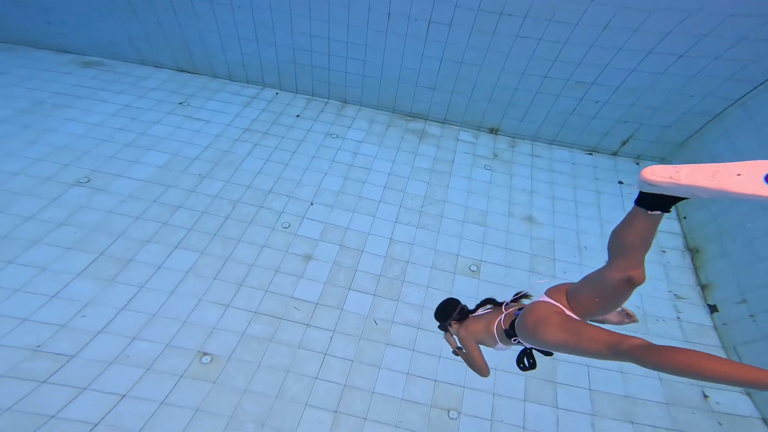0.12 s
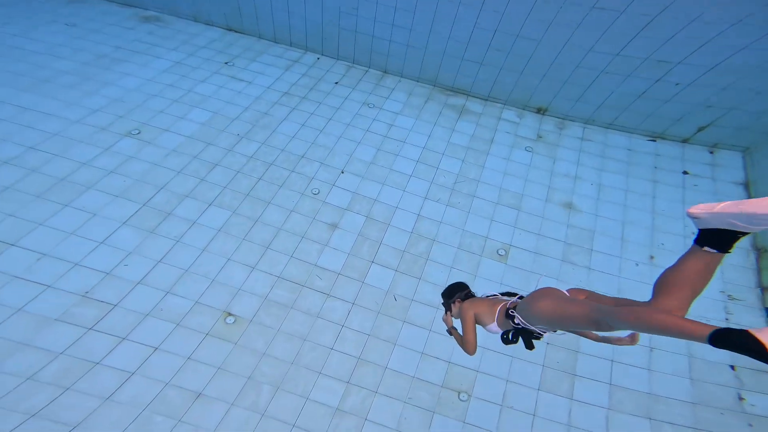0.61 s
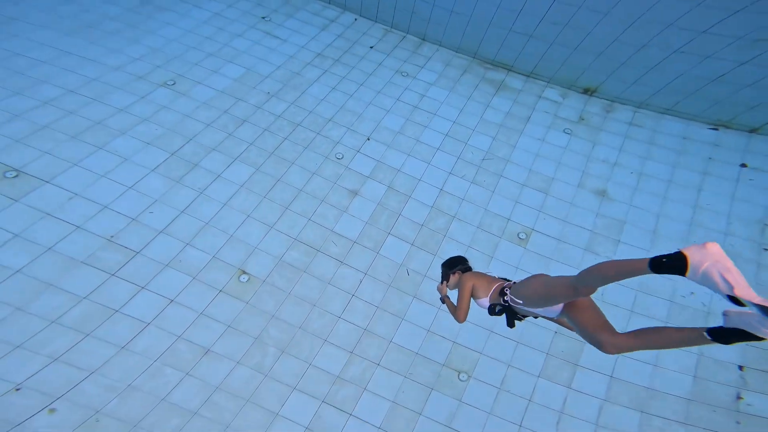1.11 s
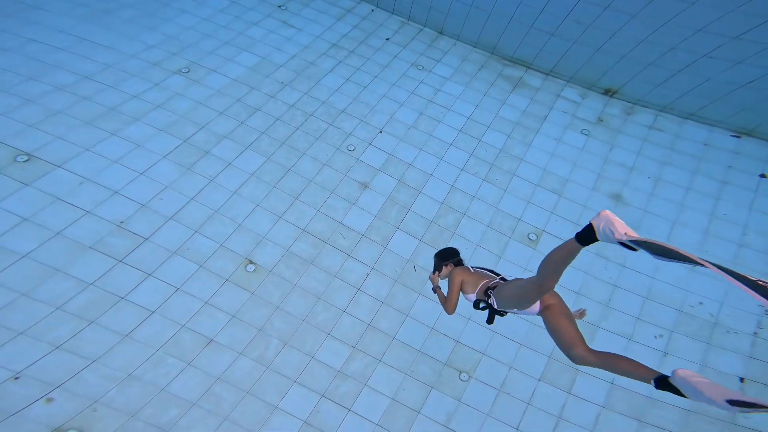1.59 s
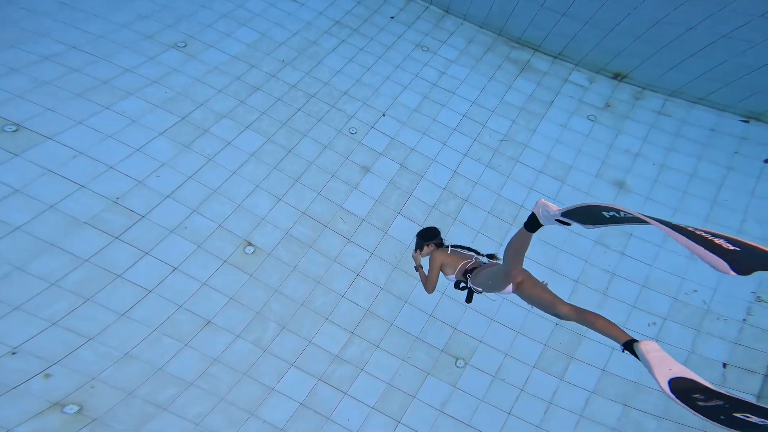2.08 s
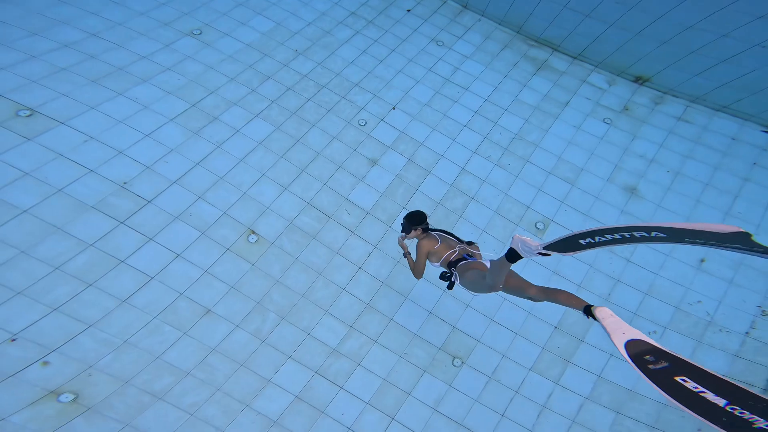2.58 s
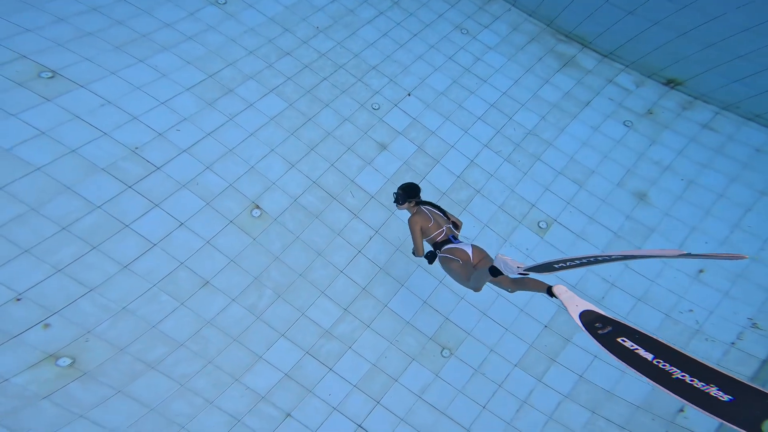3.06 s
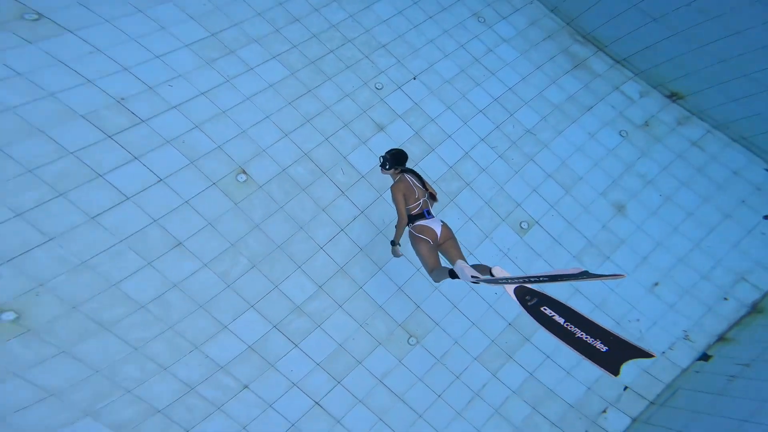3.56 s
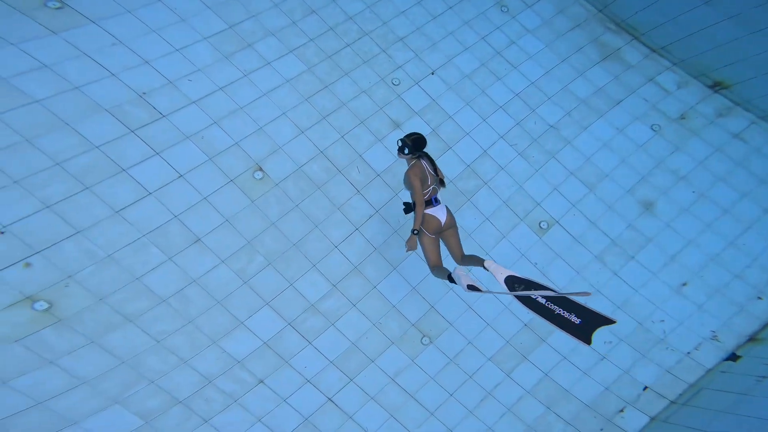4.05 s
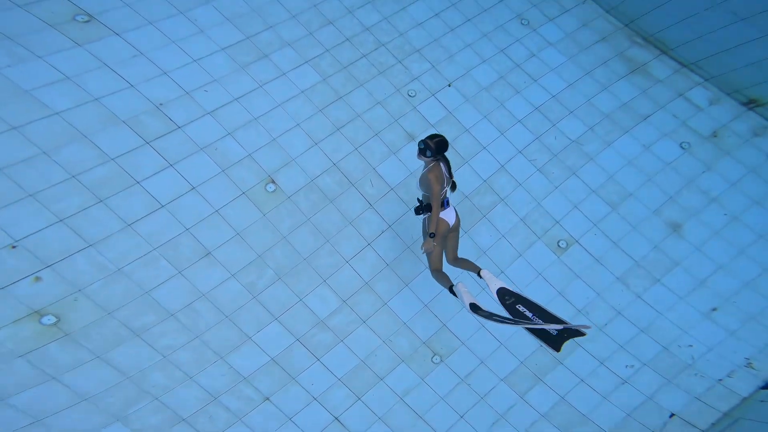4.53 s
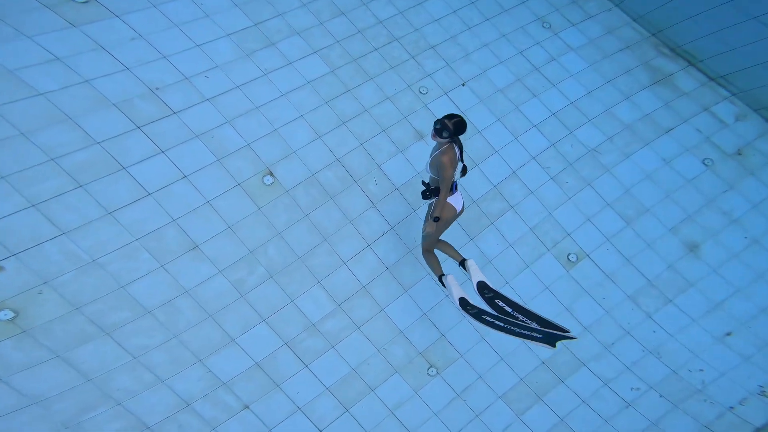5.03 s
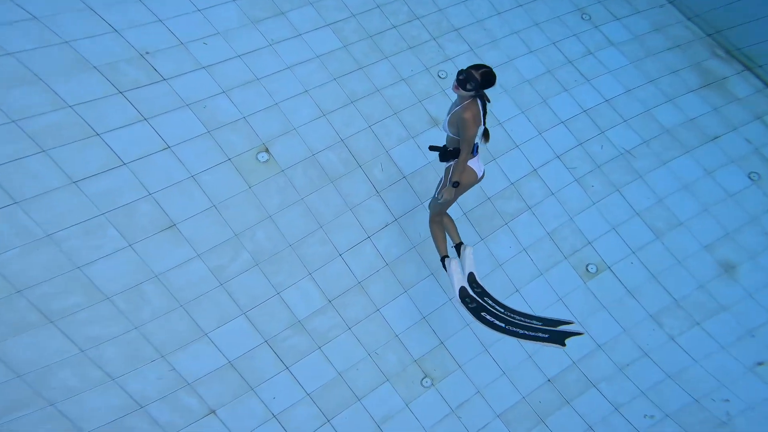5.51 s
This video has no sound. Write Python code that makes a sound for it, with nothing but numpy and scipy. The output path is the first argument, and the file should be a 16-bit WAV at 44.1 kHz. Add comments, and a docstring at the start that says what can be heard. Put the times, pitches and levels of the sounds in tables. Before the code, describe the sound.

Muffled underwater pool hum with a wavering drone, then hand rubs, hollow gulps, dull knocks and bubbling fizz on a camera housing.

```python
"""A tiled swimming pool, under water, heard through the sealed housing of a hand-held camera. Water pushing
past is low shaped noise; the pool hums as noise through resonances, with a wavering drone at first. A hand rubs
in grainy noise strokes, trapped air gulps and the catching hand jerks as damped gliding tones, and the grip
swings low. Knocks and ticks are short rough pushes that ring the housing; bubbles are small damped tones over
fizz and spray. The stereo image starts narrow and opens."""
import sys
import numpy as np
from scipy import signal
from scipy.fft import rfft, irfft, next_fast_len
from scipy.io import wavfile
from scipy.ndimage import uniform_filter1d

SR = 44100
rng = np.random.default_rng(int(sys.argv[2]) if len(sys.argv) > 2 else 0)


def field_ratio(decibels):
    """Amplitude ratio for a level in dB (20 dB per decade); scalars and array-likes work."""
    return 10 ** (np.asarray(decibels, dtype=float) / 20)


def pcm_store(signal):
    """Save signal as 16-bit PCM."""
    levels = np.round(np.clip(np.atleast_2d(signal), -1, 1) * 32767)
    wavfile.write(sys.argv[1], SR, levels.astype(np.int16).T)


N = 248724  # length in samples
SIZE = next_fast_len(N + SR)  # filter length, with a second of room for tails
HZ = np.arange(SIZE // 2 + 1) * SR / SIZE + 1e-3  # kept above zero for the logarithms
TIME = np.arange(N) / SR

# colour of the pool hum, and of the knocks, under the resonances: (f/Hz, relative level/dB)
HUM_COLOUR = [(70, -16.5), (110, -0.5), (170, -1.5), (260, -4), (420, -5), (520, -7), (650, -17.5),
              (800, -46), (1200, -55.5)]
# control levels at which the layers that follow them have their own stated level
REST_SURGE_DB, REST_FIZZ_DB = -38, -66
# exponents bending the pressure curve of a stroke; treble layers follow it more steeply
PRESS_POWER, TREBLE_POWER = 0.86, 2.7


def on_hz(table):
    """Read a (f/Hz, value) table on a log-frequency axis."""
    hz, value = np.transpose(table)
    return np.interp(np.log(HZ), np.log(np.maximum(hz, 1)), value)


def colour(table):
    """Minimum-phase response of a (f/Hz, level/dB) table, falling steeply past its last point."""
    db = on_hz(table) - 24 * np.log2(np.maximum(HZ / table[-1][0], 1))
    # folding the cepstrum forward in time gives the minimum phase
    cepstrum = irfft(db * np.log(10) / 20, SIZE)
    cepstrum[1:SIZE // 2] *= 2
    cepstrum[SIZE // 2 + 1:] = 0
    return np.exp(rfft(cepstrum))


def unit(response):
    """Scale a response so that white noise of rms 1 leaves with rms 1."""
    return response / np.sqrt(np.mean(np.abs(response) ** 2))


def through(x, response):
    """Filter by a complex response."""
    return irfft(rfft(x, SIZE) * response, SIZE)[..., :N]


def walk(rate):
    """Random levels held 1 / rate seconds and slewed twice."""
    hold = int(SR / rate)
    steps = np.repeat(rng.standard_normal(N // hold + 1), hold)
    return uniform_filter1d(uniform_filter1d(steps, hold), hold)[:N]


def turbulence(db, flicker_db=0., rate=12., grains=0., spread_db=5.):
    """Shared and unshared noise on a flickering level curve, with scattered grains (per second) on top."""
    hits = rng.random(N) < grains / SR
    sizes = hits * field_ratio(spread_db * np.minimum(rng.exponential(size=N), 5))
    grain_lift = uniform_filter1d(sizes, 60) * 60  # each grain lasts 60 samples
    rough = rng.standard_normal((2, N)) * (1 + grain_lift)
    return rough * field_ratio(db + flicker_db * walk(rate))


def patchy(x, patchy_db, rate):
    """Each third of an octave swells and fades on its own, as clouds of bubbles come and go."""
    spectrum, out = rfft(x, SIZE), 0
    place = np.clip(3 * np.log2(HZ / 700), 0, 12)
    for band in range(13):
        share = np.clip(1 - np.abs(place - band), 0, 1)
        out = out + irfft(spectrum * share, SIZE)[:, :N] * field_ratio(patchy_db * walk(rate))
    return out


def rings(table, glide, rise_s, rough=0.):
    """Damped swings rising in pitch by the share glide per t60; rough makes the pitch wobble."""
    # table: (t/s, level/dB, starting f/Hz, t60/s)
    out, t = np.zeros(N + SR), np.arange(SR // 4) / SR
    for s, db, hz, t60 in table:
        fade = np.exp(-np.log(1000) * t / t60) * (1 - np.exp(-t / rise_s))
        steps = np.repeat(rng.standard_normal(len(t) // 128 + 1), 128)[:len(t)]
        wobble = 1 + rough * steps
        phase = 2 * np.pi * np.cumsum(hz * (1 + glide * t / t60) * wobble) / SR
        i = int(s * SR)
        out[i:i + len(t)] += field_ratio(db) * fade / fade.max() * np.sin(phase)
    return out[:N]


def blows(table, response, pivot_hz, strike):
    """Rough decaying pushes ring a response; a brightness in dB an octave tilts each one about the pivot."""
    # table: (t/s, peak level/dB, brightness/dB an octave, decay of the contact/s)
    out, t = np.zeros((2, N + SR)), np.arange(8192) / SR
    lead = 200  # samples of room ahead of the touch
    ring = rfft(irfft(response, SIZE)[:len(t)])
    octaves = np.log2(np.clip(np.arange(len(ring)) * SR / len(t), 200, 5200) / pivot_hz)
    for s, db, tilt_db, contact_s in table:
        push = rng.standard_normal((2, len(t))) * np.exp(-t / max(contact_s, 2e-4))
        push[0, 0] = strike * np.sqrt(contact_s * SR)  # the first touch is a clean hit, the rest drags
        sound = irfft(rfft(np.roll(push, lead, axis=1)) * ring * field_ratio(tilt_db * octaves))
        i = int(s * SR) - lead
        out[:, i:i + len(t)] += field_ratio(db) * sound / np.abs(sound[0]).max()
    return out[:, :N]


def housing():
    """Response of the shell: each resonance lifts or dips its own band, and narrow ones ring on."""
    # housing resonances: (f/Hz, width/Hz, lift/dB)
    resonances = [(282.4, 33, 11.5), (359.4, 26, 6), (445.9, 20.7, 20), (490, 520, -1), (578.6, 22, 8),
                  (797, 53, 12), (1040, 5.5, 8.5), (1216, 180, 7), (1590, 80, 9.5), (2004, 140, 4.5),
                  (2749, 81, 5.5), (4020, 100, -4.5), (4806, 290, 6), (5520, 150, 4.5), (6980, 200, 3),
                  (7730, 200, 4.5)]
    response = 1
    for hz, width, db in resonances:
        detuning = (HZ / hz - hz / HZ) * hz / max(width, 4)
        response = response * (1 + (field_ratio(db) - 1) / (1 + 1j * detuning))
    return response


def motion_db():
    """Surge level in dB as the camera is pushed through the water."""
    # camera pushed through the water: (t/s, surge level/dB)
    motion = [(0.0, -44.5), (1.36, -34), (1.79, -36.5), (2.04, -14.5), (2.18, -36.5), (2.4, -29.5),
              (2.5, -38.5), (3.12, -31.5), (3.16, -18.5), (3.27, -24.5), (3.35, -42), (3.42, -17),
              (3.6, -23.5), (3.93, -34.5), (4.27, -26), (4.34, -22.5), (4.46, -30), (4.82, -17.5),
              (5.59, -25.5), (5.64, -21.5)]
    return np.interp(TIME, *np.transpose(motion))


def stir_db(t):
    """Fizz level in dB at the times t as water is stirred around the housing."""
    # water stirred around the housing: (t/s, fizz level/dB)
    stir = [(0.0, -69.5), (0.27, -69.5), (0.92, -65.5), (2.17, -63.5), (2.43, -64.5), (3.119, -62),
            (3.3, -56.5), (3.38, -61), (3.531, -63), (3.751, -65), (4.75, -58.5), (5.35, -56.5),
            (5.51, -52), (5.64, -56.5)]
    return np.interp(t, *np.transpose(stir))


def strokes(power, wet, firm=0.95):
    """Level in dB of all hand strokes: pressure rounds up to the firmest moment, then down."""
    # hand sliding on the housing: (start t/s, firmest t/s, end t/s, scrape level/dB before firm scales it,
    # wetness/dB of the treble against the scrape)
    rubs = [(1.184, 1.261, 1.326, -38, -17.5), (1.267, 1.331, 1.31, -45.5, -7.5),
            (1.923, 1.943, 1.964, -33, -14.5), (1.941, 1.974, 2.02, -34.5, -14),
            (1.954, 2.043, 2.095, -29.5, -21), (3.083, 3.115, 3.214, -35.5, -12.5),
            (3.16, 3.269, 3.643, -41, -31.5), (3.359, 3.46, 3.546, -27.5, -14.5),
            (3.572, 3.601, 3.6, -45.5, -15), (5.331, 5.497, 5.52, -36, -20.5)]
    grip = np.array([np.interp(TIME, row[:3], (0, 1, 0)) for row in rubs])
    pressure = np.sin(np.pi / 2 * grip)
    # firm: dB of level per dB of scrape above -30 dB
    peak = field_ratio([firm * (row[3] + 30) - 30 + wet * row[4] for row in rubs])[:, None]
    return 10 * np.log10(np.sum((peak * pressure ** power) ** 2, axis=0) + 1e-20)


def surge():
    """Water pushing past shakes the whole camera: low rumbling noise that follows the motion."""
    # colour of the surge: (f/Hz, relative level/dB)
    surge_colour = [(8, -23), (18, 1.5), (30, -8), (42, -7), (60, -25.5), (100, -35), (300, -63)]
    return through(turbulence(motion_db()), unit(colour(surge_colour)))


def sway():
    """The grip sways in low noise, in step with the surge and with the strokes of the hand."""
    # colour of the sway: (f/Hz, relative level/dB)
    sway_colour = [(30, -23), (45, -3.5), (60, -5), (72, -4), (90, -20), (150, -35), (300, -57)]
    drift = field_ratio(-45.5 + 0.71 * (motion_db() - REST_SURGE_DB))
    shake = field_ratio(strokes(PRESS_POWER, wet=False) + 5)
    level_db = 20 * np.log10(np.hypot(drift, shake))
    return through(turbulence(level_db, flicker_db=1.0, rate=11.0), unit(colour(sway_colour)))


def jolts():
    """Jolts set the grip swinging: low damped tones that glide up."""
    # jolts: (t/s, level/dB, starting swing f/Hz, t60/s)
    swings = [(1.19, -21.5, 44.7, 0.07), (1.315, -22, 30.9, 0.14), (1.235, -22.5, 72.7, 0.3),
              (1.94, -15, 48, 0.2), (1.985, -17.5, 65.5, 0.23), (2.099, -14.5, 64.3, 0.2),
              (3.15, -15.5, 54, 0.15), (3.41, -10, 40.2, 0.058), (3.525, -11.5, 48.5, 0.049),
              (4.76, -19, 40.8, 0.091)]
    return rings(swings, glide=0.23, rise_s=0.029)


def pool_hum(body):
    """The pool hums in step with the stirring: flickering noise in the resonances."""
    level_db = -45 + 0.69 * (stir_db(TIME) - REST_FIZZ_DB)
    return through(turbulence(level_db, flicker_db=3.5, rate=23.0), unit(body * colour(HUM_COLOUR)))


def rubbing(body):
    """Wet skin drags on the shell: a grainy scrape and rasp, with hiss and the swish of squeezed water above."""
    # colour of each layer under the resonances: (f/Hz, relative level/dB)
    scrape_colour = [(100, -22.5), (200, 2.5), (300, 3), (450, -5), (620, -14)]
    rasp_colour = [(520, -17.5), (650, 1), (800, -4.5), (1000, -17)]
    hiss_colour = [(600, -15), (1000, 0), (1600, -0.5), (2500, -10), (3500, -17.5), (5000, -30)]
    swish_colour = [(2400, -6.5), (3100, -1.5), (4200, 3.5), (5500, -11), (6800, -19.5)]
    # rasp and swish grow faster than the scrape with a firmer hand
    rasp_db = strokes(TREBLE_POWER, wet=True, firm=2.2) + 6.5
    swish_db = strokes(TREBLE_POWER, wet=True, firm=1.62) - 11
    hiss_db = strokes(TREBLE_POWER, wet=True)
    scrape = turbulence(strokes(PRESS_POWER, wet=False), flicker_db=5.0, rate=95.0)
    rasp = turbulence(rasp_db, flicker_db=1.0, rate=57.0)
    hiss = turbulence(hiss_db, flicker_db=1.5, rate=150.0, grains=170.0, spread_db=-10.5)
    swish = turbulence(swish_db, flicker_db=2.0, rate=90.0)
    scrape = through(scrape, unit(body * colour(scrape_colour)))
    rasp = through(rasp, unit(body * colour(rasp_colour)))
    hiss = patchy(through(hiss, unit(body * colour(hiss_colour))), patchy_db=3.5, rate=60.)
    swish = through(swish, unit(body * colour(swish_colour)))
    return scrape + rasp + hiss + swish


def gulps():
    """Air trapped under the hand gulps, and the hand catches and slips on the shell: hollow, damped and
    wobbling tones."""
    # gulps: (t/s, level/dB, starting f/Hz, t60/s)
    hollow_tones = [(1.965, -27.5, 337, 0.14), (1.99, -22.5, 272.6, 0.25), (2.026, -25, 276, 0.22),
                    (2.04, -19.5, 391, 0.04), (3.192, -42, 785.3, 0.061), (3.244, -18, 439, 0.11),
                    (3.261, -14, 448.6, 0.16), (3.345, -27, 329, 0.052), (3.412, -33.5, 727, .07),
                    (3.434, -21.5, 278, 0.042), (3.446, -16.5, 430, 0.085), (3.474, -18, 326, 0.086),
                    (3.445, -27.5, 769, 0.13), (4.875, -29.5, 412, 0.08), (4.905, -29, 445, 0.098),
                    (5.29, -27, 422, 0.15), (5.32, -31.5, 351, 0.17), (5.47, -32, 450, 0.092),
                    (5.5, -31.5, 350, 0.16)]
    return rings(hollow_tones, glide=0.047, rise_s=0.0058, rough=0.023)


def knocks(body):
    """Dull blows drive the shell's resonances harder than sound from the water does."""
    # blows on the housing: (t/s, peak level/dB, brightness/dB an octave, decay of the contact/s)
    dull_blows = [(3.072, -15.5, -8, 0.0034), (3.098, -12.5, 6.5, 0.0075), (3.187, -24, 16.5, 0.0022),
                  (3.262, -35, 9, 0.0032), (3.314, -26.5, 0, 0.0021), (3.381, -24.5, 14.5, 0.0044),
                  (4.099, -39, -11, 0.0013), (4.211, -31, -10.5, 0.0035), (5.308, -17.5, -0.5, 0.0074),
                  (5.585, -17, 1.5, 0.039)]
    return blows(dull_blows, body ** 1.42 * colour(HUM_COLOUR), pivot_hz=450., strike=2.0)


def ticks(body):
    """Small parts tick and tiny bubbles snap: brief, sharp pushes that drive the shell's resonances hardest."""
    # ticks of small parts, the brightest from tiny high bubbles: (t/s, peak level/dB, brightness/dB an octave)
    clicks = [(0.215, -57, 30), (0.4, -61, 10), (0.62, -58, 11), (1.4775, -47.5, 9.5),
              (1.937, -31.5, -6), (2.9241, -44, -1), (3.0724, -40, -8), (3.119, -47.5, 22),
              (3.133, -44.5, 22), (3.154, -43, 21), (3.1947, -34.5, -5), (3.24, -37.5, 3),
              (3.978, -47.5, 6.5), (4.1004, -38, 5), (4.17, -43, -4), (4.452, -34, 0.5),
              (4.46, -38, 2.5), (4.5376, -38.5, -3), (4.607, -41, 15), (4.707, -47.5, 8),
              (4.889, -36.5, -0.5), (4.915, -43.5, 6.5), (5, -36.5, -3.5), (5.031, -46.5, 21.5),
              (5.1134, -46.5, 9.5), (5.142, -43.5, 16), (5.1495, -34, -16), (5.3926, -39.5, 23),
              (5.422, -45, 30), (5.445, -48, 12), (5.512, -43, 12), (5.528, -49, 22), (5.553, -45, 28)]
    # colour of the ticks under the resonances: (f/Hz, relative level/dB)
    click_colour = [(500, -24), (1000, 3.5), (2000, 3), (4000, -9.5), (6500, -22), (9000, -48),
                    (13000, -75.5)]
    contact_s = .0023
    table = [(*row, contact_s) for row in clicks]
    return blows(table, body ** 1.74 * colour(click_colour), pivot_hz=2000., strike=0.5)


def bubbles():
    """Each bubble rings for a time set by size and pop; neighbours in the cluster make its pitch wobble."""
    # bubbles: (t/s, level/dB, starting f/Hz)
    pops = [(0.4, -70, 1600), (0.616, -65, 1860), (1.046, -55, 1704), (1.116, -55, 1080),
            (1.325, -56, 1253), (1.393, -53.5, 2160), (2.218, -53.5, 1549), (2.255, -59.5, 2720),
            (2.62, -48, 1200), (2.638, -51.5, 1094), (2.697, -51.5, 1590), (2.747, -56.5, 2810),
            (2.943, -51, 1576), (3.113, -30.5, 1683), (3.135, -59, 3200), (3.195, -37, 1770),
            (3.24, -31.5, 1580), (3.283, -50, 1586), (3.297, -48, 1118), (3.534, -57.5, 2090),
            (3.597, -60.5, 1660), (3.79, -56.5, 2165), (3.83, -54.5, 1130), (3.868, -50.5, 1150),
            (4.012, -50.5, 1560), (4.213, -28.5, 340), (4.263, -36, 290), (4.287, -32.5, 293),
            (4.632, -31.5, 590), (4.65, -51.5, 1974), (4.822, -45.5, 1050), (4.831, -41, 1170),
            (4.852, -51, 1263), (4.886, -47, 1200), (4.95, -58.5, 2830), (4.958, -57, 1760),
            (5.07, -52, 1230), (5.298, -52, 1106), (4.831, -58.5, 3530), (5.002, -26, 536),
            (5.048, -45.5, 1128), (5.113, -46, 2070), (5.151, -46, 2710), (5.162, -44.5, 1005),
            (5.181, -50, 990), (5.166, -41, 1490), (5.219, -56, 2970), (5.269, -48, 997),
            (5.392, -18.5, 234), (5.401, -46.5, 1040), (5.445, -54, 3060), (5.448, -49, 867),
            (5.477, -44, 2730), (5.491, -40.5, 1016), (5.502, -43.5, 1770), (5.507, -48, 2810),
            (5.54, -48, 1140), (5.577, -38.5, 1090), (5.61, -45, 1190)]
    s, db, hz = np.transpose(pops)
    # 0.072 s at 1 kHz and -45 dB; small bubbles die sooner, hard pops too
    t60 = 0.072 * (hz / 1000) ** -0.67 * np.exp(-.06 * (db + 45))
    return rings(np.transpose([s, db, hz, t60]), glide=0.043, rise_s=0.0019, rough=0.027)


def fizz(body):
    """Stirred water fizzes: grainy, patchy noise through the resonant housing."""
    # colour of the fizz under the resonances: (f/Hz, relative level/dB)
    fizz_colour = [(650, -8.5), (850, -11), (1100, -6), (1600, -2.5), (2200, -4.5), (3000, -13),
                   (4200, -14)]
    grainy = turbulence(stir_db(TIME), flicker_db=1.5, rate=46.0, grains=12.0, spread_db=-3.5)
    return patchy(through(grainy, unit(body * colour(fizz_colour))), patchy_db=3.2, rate=35.)


def spray(body):
    """Spray hisses in treble noise that climbs more steeply than the fizz."""
    # colour of the spray under the resonances: (f/Hz, relative level/dB)
    spray_colour = [(2200, -12), (3200, -7), (4100, -19), (5000, -14), (7000, -12), (8500, -19),
                    (10000, -33.5)]
    level_db = -78 + 1.26 * (stir_db(TIME) - REST_FIZZ_DB)
    grainy = turbulence(level_db, flicker_db=1.5, rate=16.0, grains=60.0, spread_db=1.8)
    return through(grainy, unit(body * colour(spray_colour)))


def fine_bubbles(count, db):
    """Many faint bubbles of chance size, louder and more crowded as the fizz rises."""
    chance = rng.random((count, 4))
    crowding = np.cumsum(field_ratio(0.8 * stir_db(TIME)))  # 0.8 dB of bubble rate per dB of fizz
    when = np.interp(chance[:, 0], crowding / crowding[-1], TIME)
    hz = 960 * 7.2 ** chance[:, 1] ** 1.4
    peak_db = stir_db(when) + db - 7 * np.log2(hz / 800) - 14 * chance[:, 2]
    t60 = (40 + 80 * chance[:, 3]) / hz  # 40 to 120 cycles
    return rings(np.transpose([when, peak_db, hz, t60]), glide=0.044, rise_s=0.0014, rough=0.017)


def drone():
    """Close strands of narrow noise around a moving centre, and one thin tone that stays put."""
    # a wavering band in the hum, creeping upward and settling: (t/s, centre f/Hz, level/dB)
    band = [(0, 408, -49.5), (0.302, 421.8, -48), (0.599, 436, -46), (0.799, 449, -44), (1.05, 446.7, -52),
            (1.3, 446, -50)]
    # strands of the wavering band: (f above its centre/Hz, width/Hz, level/dB)
    strands = [(0, 21, -1.5), (-27.5, 13, -6), (36, 17, -8.5), (72, 13, -9.5)]
    steady = 1.7  # steady tone in each strand against its noise
    s, hz, db = np.transpose(band)
    out = 0
    for up_hz, width_hz, strand_db in strands:
        slow = through(rng.standard_normal((2, N)), unit(1 / (1 + 2j * HZ / max(width_hz, 4)) ** 2))
        phase = 2 * np.pi * np.cumsum(np.interp(TIME, s, hz) + up_hz) / SR
        out = out + field_ratio(strand_db) * ((steady + slow[0]) * np.cos(phase) + slow[1] * np.sin(phase))
    level = field_ratio(np.interp(TIME, s, db, right=-200))  # the band stops after its last point
    # a thin wavering tone on the upper edge of the hum
    thin_hz, thin_width_hz, thin_db = 582, 12, -64.5
    slow = through(rng.standard_normal(N), unit(1 / (1 + 2j * HZ / thin_width_hz) ** 2))
    thin = field_ratio(thin_db) * (steady + slow) * np.cos(2 * np.pi * thin_hz * TIME)
    return thin + out * level


def ports(shared, unshared):
    """Two microphone ports hear nearly alike; a small part differs, most in the treble, and the image opens."""
    # left minus right, before the image is narrowed: (f/Hz, level/dB)
    port_db = [(60, 0), (140, -0.75), (320, 1.5), (490, 2), (740, -1.5), (1130, -4.5), (1710, 6.5),
               (2600, 0.5), (5000, -1.5), (9000, 2)]
    # phase by which left leads, before the image is narrowed: (f/Hz, lead/rad)
    port_lead = [(140, 0), (520, -0.23), (780, -1.06), (1210, -1.45), (1460, -0.71), (2070, -0.97),
                 (2500, -1.4), (2760, -0.84), (6000, -0.84)]
    # unshared sound, before the image is narrowed: (f/Hz, level/dB)
    unshared_db = [(60, -39.5), (140, -28), (300, -21), (520, -16), (890, -7.5), (1500, -11), (2600, -8.5),
                   (4500, -10), (9000, -8.5)]
    # the image starts narrow and opens: (t/s, width/0-1)
    opening = [(0, 0.06), (.4, 0.16), (.85, 0.38), (1.2, 0.66), (2.8, 0.8)]
    skew = field_ratio(on_hz(port_db) / 2) * np.exp(.5j * on_hz(port_lead))
    left, right = through(shared, skew), through(shared, 1 / skew)
    side = (left - right) / 2 + through(unshared, field_ratio(on_hz(unshared_db)))
    side = side * np.clip(np.interp(TIME, *np.transpose(opening)), 0, 1)
    return (left + right) / 2 + np.array([[1], [-1]]) * side


def scene():
    """Noise and blows have a shared and an unshared part; the ringing tones are shared by both ports."""
    body = housing()
    water = surge() + sway() + pool_hum(body) + fizz(body) + spray(body)
    shared, unshared = water + rubbing(body) + knocks(body) + ticks(body)
    shared = shared + jolts() + gulps() + bubbles() + drone()
    shared = shared + through(fine_bubbles(count=700, db=7.0), body ** 0.6)
    return ports(shared, unshared)


def low_pass(x):
    """Removes everything above the highest recorded frequency."""
    return signal.sosfilt(signal.butter(12, 14000, fs=SR, output="sos"), x)


def record(dry):
    """The camera stores the finished mix."""
    return low_pass(dry)


dry = scene()
out = record(dry)
pcm_store(out)
```